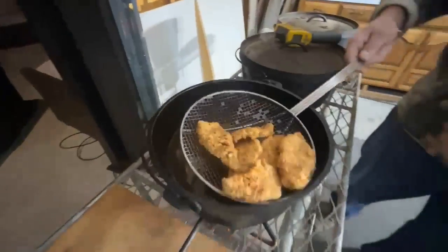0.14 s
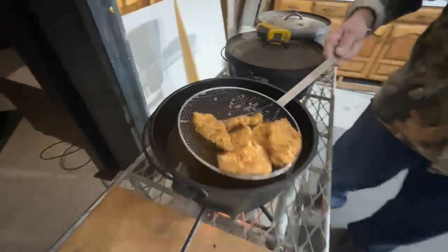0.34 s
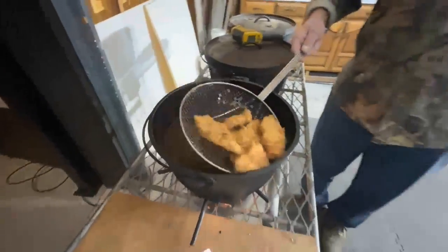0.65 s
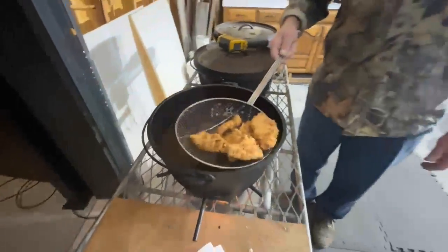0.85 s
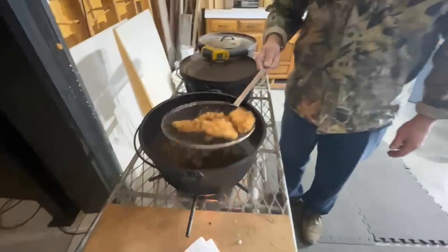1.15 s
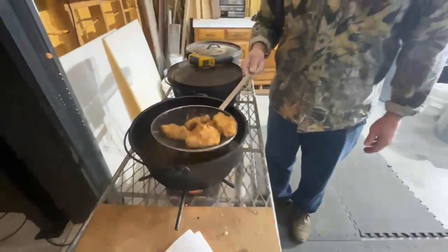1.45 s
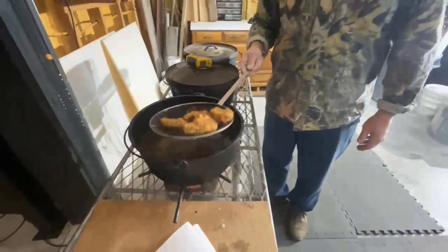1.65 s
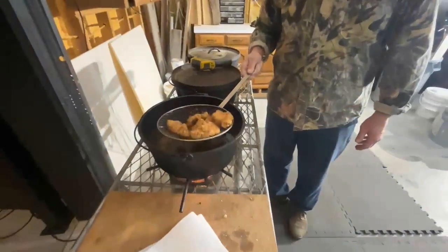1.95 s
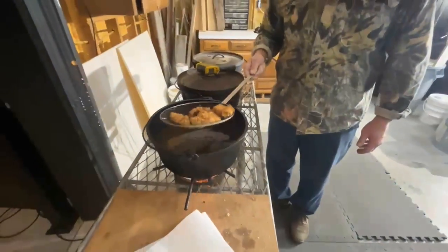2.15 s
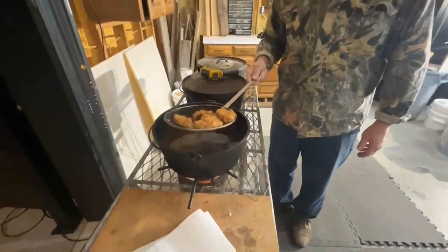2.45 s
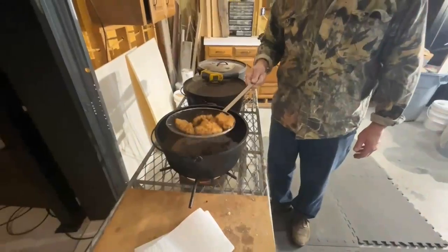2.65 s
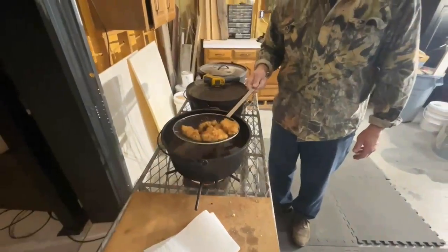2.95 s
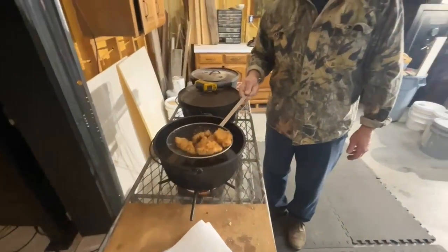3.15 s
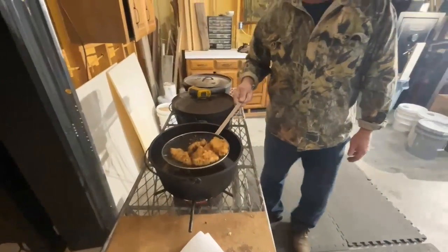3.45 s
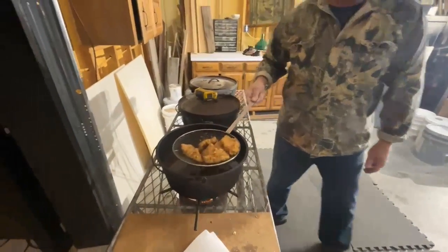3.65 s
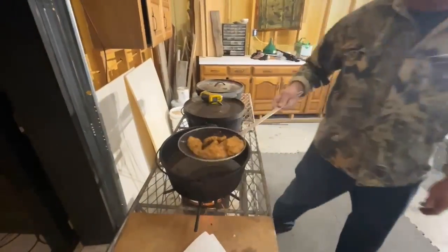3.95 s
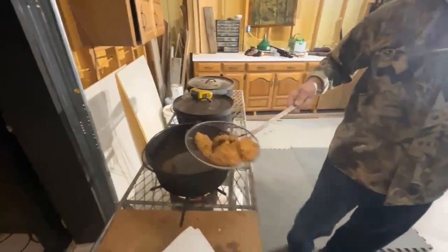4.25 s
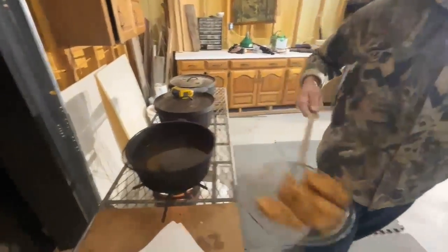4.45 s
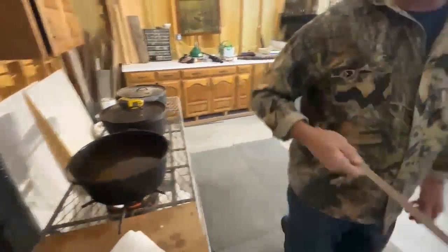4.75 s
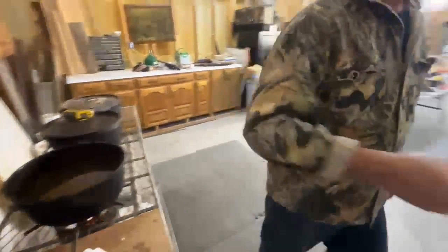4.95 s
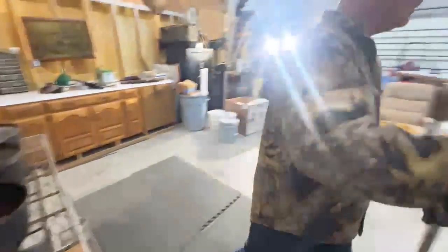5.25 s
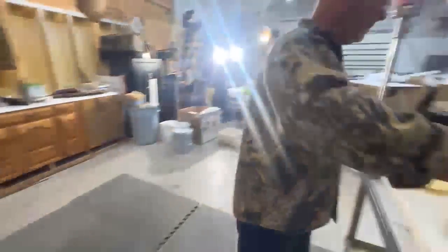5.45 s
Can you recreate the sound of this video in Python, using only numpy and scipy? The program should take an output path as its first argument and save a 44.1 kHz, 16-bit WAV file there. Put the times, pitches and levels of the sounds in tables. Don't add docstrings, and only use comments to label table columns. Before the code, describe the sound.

Close in a workshop, a wire strainer scoop hits the rim of a cast iron pot. Light bounces come first, then a hard ringing clank and a sharp double tap, then steady jangling shakes about every quarter second until just past three seconds. The metal grate clatters dully beneath and oil spits faintly. Afterwards, shoe scuffs, cloth rustle and tiny clicks over near silence. Phone microphone at arm's length, noise suppressed, with low handling thumps.

```python
import sys
import numpy as np
from scipy import signal
from scipy.fft import rfft, irfft
from scipy.io import wavfile
from scipy.ndimage import uniform_filter1d

SR = 44100
rng = np.random.default_rng(int(sys.argv[2]) if len(sys.argv) > 2 else 0)


def output_pcm(signal):
    pcm = np.clip(np.atleast_2d(signal).T, -1, 1) * 32767
    wavfile.write(sys.argv[1], SR, np.round(pcm).astype(np.int16))


def boost_factor(decibels):
    exponent = np.asarray(decibels, float) / 20
    return 10 ** exponent


N = 246959
PAD = SR // 10


def unit(x):
    return x / np.sqrt(np.mean(x ** 2) + 1e-20)


def along(points, hz):
    f, v = np.transpose(points)
    return np.interp(np.log(hz + 1), np.log(f + 1), v)


def level_curve(points):
    s, db = np.transpose(points)
    return np.interp(np.arange(N) / SR, s, db)


def noise(gain, patchy_db, size=N, grit_db=0):
    white = rng.standard_normal((2, size + 512))
    grit = boost_factor(grit_db * unit(uniform_filter1d(white[1], size=90)))
    z = signal.stft(white[0] * grit, nperseg=512)[2]
    field = uniform_filter1d(rng.standard_normal(z.shape), size=7, axis=0)
    field = uniform_filter1d(field, size=5, axis=1)
    x = signal.istft(z * boost_factor(patchy_db * unit(field)), nperseg=512)[1][:size]
    return unit(irfft(rfft(x) * gain(np.fft.rfftfreq(size, 1 / SR)), size))


def add(track, s, sound):
    start = PAD + round(s * SR)
    track[start:start + len(sound)] += sound


def after_blows(table, rise, t60):
    since = np.maximum(np.arange(N) / SR - np.array(table)[:, :1], 0)
    return (1 - np.exp(-since / rise)) ** 2 * boost_factor(-60 * since / t60)


def ring(hz, db, t60, t, scatter_db, rough):
    hz, db, t60 = np.array([hz, db, np.minimum(t60, 1)])[:, :, None]
    luck = rng.standard_normal((2, len(hz), len(t) // 128 + 2))
    wander = rough * np.sqrt(hz / 1000) * np.cumsum(luck[0], axis=1)
    swell = db + scatter_db * luck[0, :, :1] + 12 * rough * uniform_filter1d(luck[1], size=5, axis=1)

    def fine(rows):
        return np.array([np.interp(t * SR / 128, np.arange(len(row)), row) for row in rows])

    phase = 2 * np.pi * hz * t + 30 * luck[1, :, :1] + fine(wander)
    return np.sum(boost_factor(fine(swell) - 60 * t / t60) * np.sin(phase), axis=0)


POT_HZ = [403, 715, 1116, 1147, 1572, 2565, 2612, 2723, 3056, 3085, 3193, 3231, 3561, 3876, 4209, 4866,
          4940, 5762, 6184, 7070, 8061, 9089, 11400, 11660, 12487]
SCOOP_HZ = [1248, 2300, 2566, 2610, 2654, 2719, 2789, 2841, 3055, 3196, 3235, 3555, 3771, 3885, 4313, 4423,
            4579, 4948, 5350, 5765, 5819, 7085, 7400, 8340, 9342, 10500, 11490]


def wire_gain(size):
    f = np.fft.rfftfreq(size, 1 / SR)
    strands = sum(1.1 / (1 + ((f - hz) / 30) ** 2) for hz in rng.uniform(4000, 14000, size=45))
    modes = sum(0.9 / (1 + ((f - hz) / (20 + 0.001 * hz)) ** 2) for hz in SCOOP_HZ + POT_HZ[7:])
    return 1 + strands + modes


# f/Hz, t60/s
RATTLE_TAIL = [(150, 0.88), (600, 0.25), (1200, 0.39), (2700, 0.42), (6000, 0.26), (12000, 0.32)]


def crash(spectrum, wires, faster):
    size = 2 * len(wires) - 2
    rattle = noise(lambda f: boost_factor(along(spectrum, f)) * wires, 2.2, size=size, grit_db=1.5)
    hz, t, z = signal.stft(rattle, SR, nperseg=256)
    loss_db = 60 * faster * t / along(RATTLE_TAIL, hz)[:, None]
    return signal.istft(z * boost_factor(-loss_db), SR, nperseg=256)[1][:size]


# t/s, scoop peak level/dB, then level/dB of each of the three pot bells
SHAKES = [(0.612, -22.5, -35.5, -35, -53), (1.1907, -21.5, -29.5, -34.5, -39.5),
          (1.4425, -20, -30.5, -38, -44), (1.708, -21, -31.5, -57, -77), (1.946, -22.5, -49, -70, -85),
          (2.2563, -21.5, -72.5, -57.5, -33.5), (2.5445, -21.5, -55, -43.5, -35.5),
          (2.8386, -21.5, -52, -46, -39), (3.1105, -23, -50, -43, -35)]
TAPS = [
    (0.8559, -23.5, -40, -48.5, -63.5),
    (0.8949, -32, -34.5, -64.5, -59.5),
    (3.2129, -26, -65.5, -66, -58),
]
EARLIER = [(-0.068, -24, -29, -69, -42)]
CLANK = [(.664, -11, -35.5, -19, -31.5)]
LIGHT_CONTACTS = [(.0895, -37.5, -58, -56, -51), (.134, -41.5, -67, -61, -58.5), (.6535, -27.5, -42, -44.5, -51)]
# f/Hz, and their t60/s
BELL_HZ = [1615.6, 2073.3, 2112.4, 1572]
BELL_T60 = [0.74, 0.57, 0.61, 0.82]
# level/dB in the hard blow, level/dB in the earlier one, t60/s
POT = [(-19, -29, 0.25), (-41, 6.5, 0.42), (-11, -15, 0.27), (-16.5, -9.5, 0.32), (-18.5, -19, 0.69),
       (-31, -1, 0.26), (-16.5, -6, 0.062), (-23.5, -17, 0.2), (-21, -15, 0.75), (-22, -7, 0.77),
       (-6, -4, 0.29), (-15.5, -7, 0.38), (-11, -9, 0.25), (-7.5, -41, 0.18), (-25, 6, 0.15),
       (-30.5, -15, 0.75), (-24.5, -22, 0.29), (-26, -29, .15), (-23, -2, 0.19), (-27.5, -36, .14),
       (-36.5, -23, 0.11), (-27.5, -2, 0.19), (-44, -25, .2), (-26, -51, 0.59), (-27, -60, 0.29)]
# level/dB, t60/s
SCOOP = [(0.5, 0.1), (-27, 0.068), (3.5, 0.27), (-10.5, 0.13), (1.5, 0.12), (-7.5, 0.37), (-2.5, 0.079),
         (-3, 0.22), (-9.5, 0.077), (-22.5, 0.48), (-12.5, 0.36), (-7, 0.26), (-10.5, 0.29), (-14, 0.069),
         (-17, 0.82), (-10.5, 0.25), (-17.5, 0.27), (-22, 0.43), (-17, 0.9), (-22, 0.11), (-30.5, 0.073),
         (-34.5, .2), (-22.5, 0.053), (-17.5, 0.66), (-29, .2), (-11, 0.083), (-28.5, 0.11)]
# f/Hz, then rows of level/dB, t60/s
GRATE_HZ = [394, 492, 572, 625, 675, 716, 888, 1150, 1226]
GRATE = [(-11.5, 0.084), (6, 0.063), (-1.5, .25), (7, 0.16), (3.5, 0.36), (1, 0.23), (-8, 0.098),
         (-4.5, 0.3), (-2, 0.033)]
# f/Hz, level/dB per Hz
MESH = [(530, -36), (900, -8), (1620, -2), (1940, -10.5), (2130, -9.5), (2340, -9.5), (2610, 2.5),
        (3400, -15.5), (3830, -8), (10500, -23), (15700, -31.5)]
SNAP = [(530, -57), (900, -8), (1640, 0), (2290, -6), (2740, 4.5), (3360, -13), (3780, -8), (6330, -15.5),
        (8640, -25.5), (11800, -36.5), (15700, -93)]
CLATTER = [(59, -105.5), (100, -51), (146, -30.5), (333, -18), (382, -7), (426, -11.5), (633, -2),
           (952, -12.5), (1300, -20.5), (1690, -41.5), (2860, -120)]


def blows():
    hard_db, earlier_db, pot_t60 = np.transpose(POT)
    scoop_db, scoop_t60 = np.transpose(SCOOP)
    pot_t60 = np.minimum(pot_t60, 1500 / np.array(POT_HZ))
    scoop_t60 = np.minimum(scoop_t60, 1200 / np.array(SCOOP_HZ))

    def dull(hz):
        return np.maximum(np.array(hz) - 6000, 0) / 250

    muffled = [(hz, db - dull(hz)) for hz, db in SNAP]
    shaken = (SCOOP_HZ, scoop_db, scoop_t60)
    tapped = (SCOOP_HZ, scoop_db, .5 * scoop_t60)
    dulled = (SCOOP_HZ, scoop_db - dull(SCOOP_HZ), 0.81 * scoop_t60)
    left_ringing = (POT_HZ, earlier_db, 0.81 * pot_t60)
    clanked = (POT_HZ, hard_db, pot_t60)
    kinds = [(SHAKES, .012, .012, shaken, 3, .25, -12, MESH, -11, 1.05, -9, .7, -13.5),
             (TAPS, .0008, .0011, tapped, 3, .2, -14, SNAP, -8, 2.3, -25, 2.4, -20),
             (LIGHT_CONTACTS, .001, .001, dulled, 4, .2, -10, muffled, -9, 1.6, -12, 1.8, -10),
             (EARLIER, .01, .01, left_ringing, 0, .13, -3, SNAP, -14, 1.1, -22, 0, -15),
             (CLANK, .004, .008, clanked, 0, .06, -5, MESH, -11, 1.7, -7, 1.2, -21)]
    rows = [(row[0] - kind[1], row[1:], kind[2:]) for kind in kinds for row in kind[0]]
    rows.sort(key=lambda r: r[0])
    ends = [.2, .24] + [r[0] for r in rows[3:]] + [3.36]
    wires = wire_gain(SR // 3)
    track, t = np.zeros(PAD + N + SR), np.arange(SR // 3) / SR
    for (s, row, kind), after in zip(rows, ends):
        db, *bell_db = row
        rise, modes, scatter_db, rough, metal_db, colour, rattle_db, faster, twin_db, crack, passed_db = kind
        grate_db = db + passed_db

        bells = ring(BELL_HZ, bell_db + [bell_db[0] + twin_db], BELL_T60, t, 0, rough=0.03)
        bells *= 1 - np.exp(-t / (1.6 * rise))
        grate = ring(GRATE_HZ, *np.transpose(GRATE), t, 0.68, rough=0.9) * boost_factor(grate_db - 3.5)
        grate *= 1 - np.exp(-t / (1.5 * rise))
        metal = ring(*modes, t, scatter_db, rough) * boost_factor(db + metal_db)
        stifled = np.exp(-np.maximum(t - (after - s), 0) / .03)
        sound = stifled * (bells + grate + metal)

        contact = 1 + crack * np.exp(-np.abs(t - 2.0 * rise) / (0.14 * rise + .005))
        sound += contact * boost_factor(db + rattle_db) * crash(colour, wires, faster)
        clatter = crash(CLATTER, wires, faster)
        sound += boost_factor(grate_db + 2) * clatter * (1 - np.exp(-t / (1.4 * rise)))

        onset = (1 - np.exp(-t / rise)) ** 2
        fade = np.minimum(1, (t[-1] - t) / 0.021)
        add(track, s, sound * onset * fade)
    return track[PAD:PAD + N]


# t/s, level/dB
LOOSE = [(1.1, -71.5), (1.3, -49.5), (2.1, -46.5), (2.35, -60), (3.1, -69.5), (3.5, -62), (3.75, -95)]


def loose():
    handle = noise(lambda f: 1 / (1 + ((f - GRATE_HZ[0]) / 6) ** 2), 0)
    handle *= after_blows(SHAKES, .03, t60=2.1).max(axis=0)

    ticks = (rng.random(N) < 140 / SR) * boost_factor(7.2 * np.minimum(rng.exponential(size=N), 2))
    ticks = ticks * rng.choice([-1, 1], N)
    f = np.fft.rfftfreq(N, 1 / SR)
    width = 45
    bars = sum(boost_factor(db) * 1j * f * width / (hz * hz - f * f + 1j * f * width)
               for hz, (db, _) in zip(GRATE_HZ, GRATE))
    soft = (1 + 1j * f / 1400) ** 3
    chatter = unit(irfft(rfft(ticks) * bars / soft, N))
    chatter *= after_blows(SHAKES, 0.056, t60=2.2).max(axis=0)
    return boost_factor(level_curve(LOOSE)) * (boost_factor(1) * handle + boost_factor(-1) * chatter)


def knocks(table, cycles, width, rise):
    track, t = np.zeros(PAD + N + SR), np.arange(SR // 4) / SR
    for s, db, hz in table:
        puff = noise(lambda f: 1 / (1 + ((f - hz) / (width * hz)) ** 4), 0, size=len(t))
        envelope = boost_factor(db - 60 * t * hz / cycles) * (1 - np.exp(-t / rise)) ** 2
        add(track, s - rise, envelope * puff)
    return track[PAD:PAD + N]


# t/s, level/dB, f/Hz
JOLTS = [(1.319, -39.5, 440), (1.606, -38.5, 413), (1.867, -43, 404), (2.05, -33, 640), (2.086, -40.5, 407),
         (2.128, -44.5, 580), (2.164, -43, 734), (2.234, -40.5, 643), (2.389, -68, 700),
         (2.932, -44.5, 334), (3.294, -47.5, 400), (3.452, -51.5, 364), (3.529, -57, 412),
         (5.525, -55, 324)]


def jolts():
    return knocks(JOLTS, cycles=49.4, width=0.39, rise=0.00273)


# t/s, level/dB, f/Hz
CLICKS = [(1.6566, -45.5, 5260), (1.675, -51.5, 3060), (2.061, -55, 2860), (3.4146, -60, 6160),
          (3.4274, -70, 3610), (3.8694, -64, 7560), (4.1734, -50.5, 5180), (4.7902, -60.5, 2504),
          (5.0694, -53.5, 4700), (5.1982, -47, 2980), (5.2147, -49.5, 2160), (5.3158, -62.5, 3230),
          (3.899, -72.5, 2530)]


def clicks():
    return knocks(CLICKS, cycles=160, width=0.19, rise=0.00172)


# t/s, level/dB, f/Hz
SPITS = [(.25, -65.5, 12900), (1.81, -49, 11280), (1.826, -55, 14300), (1.995, -50, 13500),
         (2.052, -60, 9200), (2.07, -60, 14000), (2.072, -54, 7750), (2.084, -60, 7840), (2.68, -79, 13400),
         (2.714, -51, 13900), (2.729, -56, 14000), (3.063, -64, 12900), (3.088, -62, 12400),
         (3.19, -65, 15000), (3.835, -75, 7700), (3.858, -67.5, 8250), (3.874, -53.5, 14200),
         (3.876, -71, 7480), (4.05, -63.5, 10200)]


def spits():
    return knocks(SPITS, cycles=254, width=0.0927, rise=0.0016)


# t/s at full strength, rise/s, hold/s, level/dB, brightness/dB
SCUFFS = [(0.416, 0.186, 0.0068, -58.5, 6.5), (0.468, 0.025, 0.029, -45, 4), (3.701, 0.022, .04, -54, -1.5),
          (4.101, 0.036, 0.011, -55.5, 7), (4.225, 0.013, .04, -48, -1.5), (4.44, 0.011, 0.077, -50, -5),
          (4.345, .006, 0.0022, -62, -14), (5.101, 0.027, 0.025, -46, 2.5), (5.378, 0.1, 0.018, -71.5, 2)]
RUSTLES = [(2.64, 0.088, 0.11, -53, -0.5), (3.969, 0.056, 0.059, -68, 8.5), (4.19, 0.012, 0.0098, -54, 2.5),
           (4.339, 0.15, 0.071, -47.5, 1), (5.201, 0.13, 0.033, -68, -15), (4.8, 0.019, 0.036, -79.5, 8),
           (5.441, 0.09, 0.022, -65, -13)]
# f/Hz, level/dB per Hz
DRAG = [(650, -65), (1100, -36.5), (1290, -17.5), (1580, -4.5), (1790, -2.5), (2800, -5.5), (3640, -49),
        (6160, -120)]
RUB = [(1590, -22.5), (2700, -2), (2940, -1.5), (3690, -4.5), (5140, -10), (6200, -22.5), (8060, -23),
       (13600, -120)]
HISS = [(3240, -26.5), (5500, 0), (6140, -0.5), (8530, -1), (13500, -7.5), (15700, -14.5)]


def scuffs():
    sole_db, cloth_db = (-1.5, -0.5, -6.5), (-15.5, -1.5, -20.5)
    lag_s, release = (0.0043, 0.0013, 0.0011), (386, 398, 520.5)
    rise_db, sag = 34.5, 59
    echo_db, echo_t60 = -13.5, (.5, .45, 0.17)
    s, rise, hold, db, bright_db = np.transpose(SCUFFS + RUSTLES)[:, :, None]
    mix_db = np.array([sole_db] * len(SCUFFS) + [cloth_db] * len(RUSTLES)) + bright_db * np.arange(-1, 2)
    sound = 0
    for k, colour in enumerate((DRAG, RUB, HISS)):
        since = np.arange(0, N, 64) / SR - s - lag_s[k]
        loss_db = rise_db * np.maximum(-since, 0) / rise
        loss_db += release[k] * np.maximum(since - hold, 0)
        loss_db += sag * (1 - k) * np.clip(since, 0, hold)
        echo = boost_factor(echo_db - 60 * since / echo_t60[k]) * (since > hold)
        level = np.sum(boost_factor(db + mix_db[:, k:k + 1]) * (boost_factor(-loss_db) + echo), axis=0)
        level = uniform_filter1d(np.repeat(level, 64)[:N], size=64)
        sound += level * noise(lambda f: boost_factor(along(colour, f)), 3, grit_db=2)
    return sound


# t/s, level/dB, f/Hz, t60/s
THUMPS = [(0.686, -42.5, 161.5, 0.18), (2.884, -22, 155, 0.028), (2.887, -58, 48, 0.37),
          (3.13, -20.5, 158, 0.018), (3.132, -54, 43.7, 0.2), (5.514, -21.5, 127.5, 0.016)]


def thumps():
    track, t = np.zeros(PAD + N + SR), np.arange(SR // 2) / SR
    for s, db, hz, t60 in THUMPS:
        push = -np.sin(2 * np.pi * hz * t * (1 - 0.52 * t))
        add(track, s, boost_factor(db - 60 * t / t60) * push * (1 - np.exp(-t / 0.009)))
    return track[PAD:PAD + N]


# f/Hz, level/dB per Hz
DRONE = [(35, -67.5), (60, -13.5), (204, -5), (240, 9), (295, -5), (480, 4), (619, -1.5), (798, -2),
         (1130, -6), (1520, -6.5), (2710, -19.5), (5430, -17), (6090, -56), (7500, -44), (15000, -37)]
FIZZ = [(1000, -37), (2000, 7.5), (5000, -9), (8000, -5), (15500, -5.5)]
# f/Hz, width/Hz, level/dB
HUM = [(254, 19, -19), (518.4, 37, 0), (780, 63, 7)]
# t/s, level/dB
PASSED = [(0, -62), (3.3, -62), (3.7, -66), (4.25, -60), (4.6, -64), (5.03, -67), (5.2, -61), (5.6, -63)]
# t/s, level/dB
PUFFS = [(.67, -78.5), (1.4, -87), (2.93, -69), (3.15, -64.5), (3.52, -79), (4.27, -73.5), (4.85, -68.5),
         (5.18, -82.5), (5.51, -75.5)]


def room():
    struck = np.array(SHAKES + CLANK + EARLIER)
    lift = boost_factor(struck[:, 1:2] - 26.5) * after_blows(struck, 0.052, t60=.6)
    drone_level = boost_factor(level_curve(PASSED)) + np.sum(lift, axis=0)

    def drone_gain(f):
        bands = 0.83 + sum(boost_factor(db) / (1 + ((f - hz) / w) ** 2) for hz, w, db in HUM)
        return boost_factor(along(DRONE, f)) * bands

    drone = noise(drone_gain, 2.6)
    fizz = noise(lambda f: boost_factor(along(FIZZ, f)), 1.7, grit_db=-1.0)
    t = np.arange(N) / SR
    air_level = boost_factor(-92.5) + sum(boost_factor(db - 131 * np.abs(t - s)) for s, db in PUFFS)
    air = noise(lambda f: f / 30 / (1 + (f / 34) ** 6), 0.76)
    return drone_level * boost_factor(-7.5) * drone + boost_factor(-81.5) * fizz + air_level * air


def scene():
    small = jolts() + clicks() + spits()
    low_cut = signal.butter(4, 230, "high", fs=SR, output="sos")
    airborne = signal.sosfilt(low_cut, blows() + loose() + small + scuffs())
    return (airborne + thumps() + room())[None]


def top_cut(x):
    return signal.sosfilt(signal.butter(12, 15870, fs=SR, output="sos"), x)


def record(dry):
    hz, t, z = signal.stft(dry, SR, nperseg=512, noverlap=384)
    power = uniform_filter1d(np.abs(z) ** 2, size=5, axis=2)
    power = np.abs(uniform_filter1d(power, size=3, axis=1))
    faint = boost_factor(2 * along([(600, -125), (2000, -100), (12000, -104)], hz))[:, None]
    gain = 0.31 + 0.78 * power / (power + faint)
    clean = signal.istft(z * gain, SR, nperseg=512, noverlap=384)[1][:, :N]
    return top_cut(clean)


dry = scene()
out = record(dry)
output_pcm(out)
```